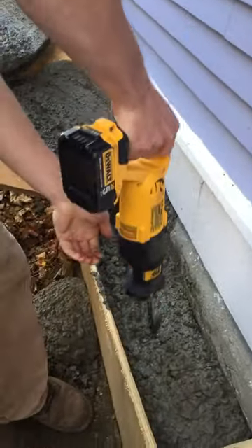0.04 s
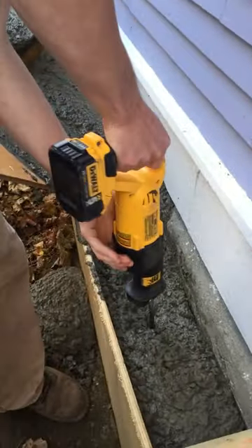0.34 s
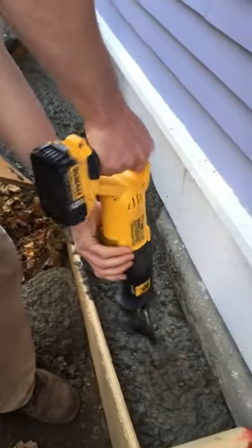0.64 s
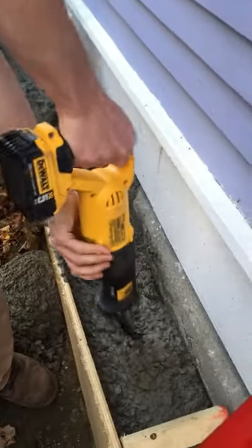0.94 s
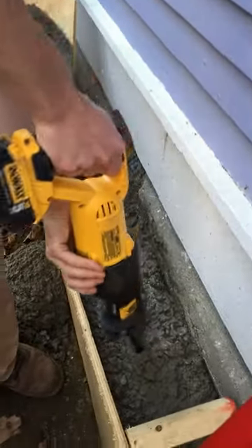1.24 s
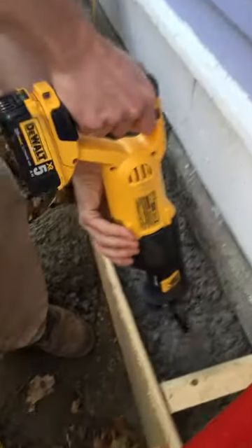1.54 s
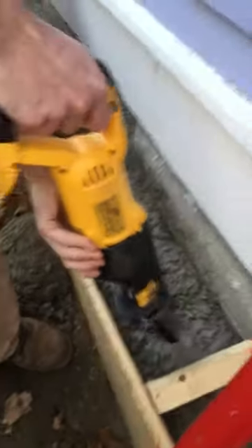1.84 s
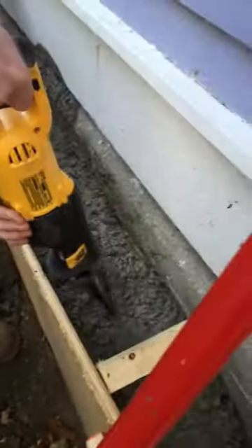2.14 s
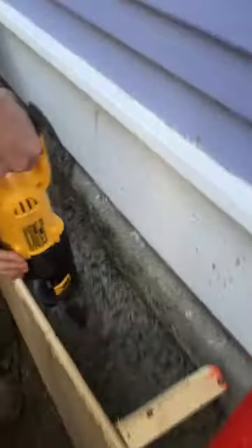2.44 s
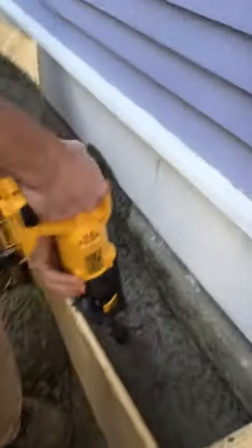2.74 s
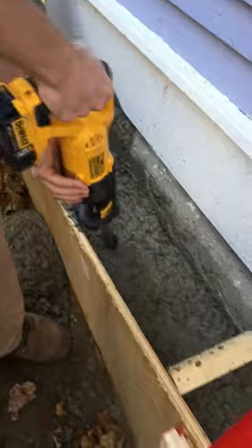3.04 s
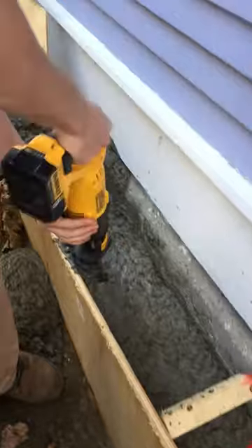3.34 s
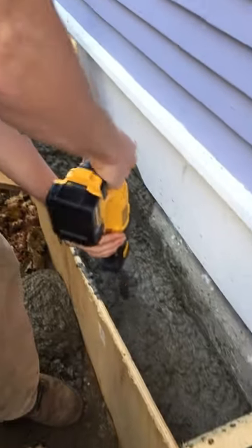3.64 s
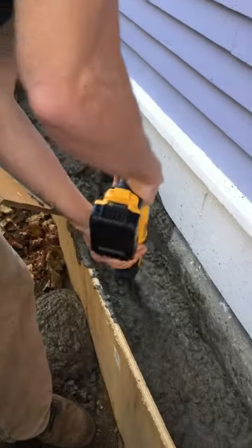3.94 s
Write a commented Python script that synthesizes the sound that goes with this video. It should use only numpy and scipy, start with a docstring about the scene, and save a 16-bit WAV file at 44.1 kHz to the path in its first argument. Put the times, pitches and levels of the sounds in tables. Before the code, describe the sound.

Fast steel clacking and knocking from a reciprocating saw vibrating wet concrete, then running lighter.

```python
"""Fast steel clacking and knocking: a cordless reciprocating saw shakes a rod in wet concrete.
Every stroke clacks in the drive and knocks the rod about, ringing housing, shaft and rod over a motor whine.
The saw labours at about 30 strokes a second, then runs lighter at about 40.
Outdoors: a house wall and the ground return quick echoes; an engine idles behind."""
import sys
import numpy as np
from scipy import signal
from scipy.fft import rfft, irfft
from scipy.io import wavfile

SR = 44100
rng = np.random.default_rng(int(sys.argv[2]) if len(sys.argv) > 2 else 0)


def master(y):
    """Save y as 16-bit WAV."""
    cut = np.clip(np.atleast_2d(y).T, -1, 1)
    pcm = np.round(cut * 32767)  # scale
    wavfile.write(sys.argv[1], SR, pcm.astype(np.int16))


N = 176400
TIME = np.arange(N) / SR
HZ = np.maximum(np.arange(N + 1) * SR / (2 * N), 1)
TRIGGER_S, UNLOAD_S = .473, 2.485  # saw starts; load comes off the rod


def from_db(db):
    """Decibels to gain."""
    return 10 ** (np.asarray(db) / 20)


def rms_one(x):
    """Scale to rms 1."""
    return x / np.sqrt(np.mean(x ** 2) + 1e-20)


def in_time(rows):
    """Columns of a time curve at every sample."""
    time_s, *columns = np.transpose(rows)
    return [np.interp(TIME, time_s, column) for column in columns]


def along_hz(points):
    """Spectrum in dB at every frequency in HZ."""
    hz, db = np.transpose(points)
    return np.interp(np.log(HZ), np.log(hz), db)


def colour(x, response_db):
    """Causal, minimum-phase filter."""
    cepstrum = irfft(np.log(from_db(response_db)))
    cepstrum[1:N] *= 2
    cepstrum[N + 1:] = 0
    return irfft(rfft(x, 2 * N) * np.exp(rfft(cepstrum)))[:N]


def drift(rate_hz, size=16000):
    """Unit normal draws at rate_hz, joined by straight lines."""
    return np.interp(TIME * rate_hz, np.arange(size), rng.standard_normal(size))


def swell(centre_s, width_s):
    """Smooth bump of height 1."""
    return np.exp(-((TIME - centre_s) / width_s) ** 2)


def unload(loaded, light, fade_s=.027):
    """Crossfade from the value under load to the value running light."""
    return loaded + (light - loaded) * np.clip((TIME - UNLOAD_S) / fade_s + .5, 0, 1)


def idling_engine(rush_db=-35.5, wander_rad=.059):
    """Wavering low tones over rumble and hiss; the level sinks as the saw starts."""
    # engine tones: pitch_hz, level_db, waver_db
    lines = [(40.9, -36.5, 0.5), (68, -59, -7), (118, -37, 1.5), (133.3, -40, 3), (277, -54.5, -4),
             (298.7, -49.5, 1.5)]
    # rumble and hiss spectrum: freq_hz, relative_db
    rush_shape = [(22, -22), (40, -24), (58, -15.5), (90, -14), (140, -20.5), (190, -22), (310, -26),
                  (430, -32.5), (540, -30.5), (750, -30.5), (2000, -36), (3700, -43.5), (4900, -53.5),
                  (7000, -59.5), (15000, -68.5)]
    # overall level: time_s, gain_db
    level = [(0, 2.5), (.33, 2.5), (.5, 1), (.8, -11), (2.4, -8), (4, -6.5)]
    tones = 0
    for hz, db, waver_db in lines:
        gain = from_db(db + waver_db * drift(9.3)) * np.sqrt(2)
        tones += gain * np.sin(2 * np.pi * (hz * TIME + rng.random()) + wander_rad * drift(9))
    rush = rms_one(colour(rng.standard_normal(N), along_hz(rush_shape)))
    return from_db(in_time(level)[0]) * (tones + from_db(rush_db) * rush)


def thump(pitch_hz=68.4, level_db=-27):
    """Soft low thump just before the saw starts."""
    return from_db(level_db) * swell(.325, width_s=.025) * np.sin(2 * np.pi * pitch_hz * TIME)


def yard_echoes(x, delay_wander=.117):
    """Nearby hard surfaces return quick echoes, shifting as the tool moves."""
    # wall, form boards and ground: delay_s, gain_db
    echoes = [(.0023, -15.5), (.0071, -21), (0.0128, -24)]
    return x + sum(from_db(db) * np.interp(TIME - delay_s * (1 + delay_wander * drift(3)), TIME, x)
                   for delay_s, db in echoes)


def motor_whine(strokes, roughness_hz=16, swing_hz=28):
    """Rough tones climb as the load comes off; the motor slows and recovers within each stroke."""
    # whine curve: time_s, pitch_hz, level_db (re knocking)
    curve = [(1.2, 3060, -22), (2.47, 2960, -13), (2.6, 3560, -20), (2.75, 3635, -7.5), (3.24, 3660, -11.5),
             (3.35, 3780, -8), (3.57, 3815, -9.5), (3.72, 3970, -13), (4.0, 4120, -19)]
    # whine tones: pitch_ratio, level_db
    partials = [(0.824, -4), (1, -3)]
    pitch_hz, level_db = in_time(curve)
    cycles = np.cumsum(pitch_hz + swing_hz * np.sin(2 * np.pi * strokes)) / SR
    tones = 0
    for ratio, db in partials:
        roughness = 1 + drift(roughness_hz) + 1j * drift(roughness_hz)
        tones += from_db(db) * rms_one(np.real(roughness * np.exp(2j * np.pi * ratio * cycles)))
    return from_db(level_db) * tones * np.minimum(strokes, 1)


def passing_rings(clacks, knocks, fade_s=.048, clacks_only_above_hz=5000):
    """Single resonances swell and fade as the rod bears differently."""
    # resonances: start_s, end_s, pitch_hz, width_hz, level_db (re knocking)
    rings = [(.54, .61, 2600, 700, -9), (.76, .83, 240, 90, -12), (1.1, 1.32, 800, 70, -17),
             (1.96, 2.0, 210, 90, -12), (2.156, 2.47, 597, 50, -16), (2.32, 2.46, 1600, 90, -9),
             (3.73, 4.0, 8000, 600, -16.5), (3.77, 4.05, 1180, 300, -12), (1.25, 1.35, 5850, 160, -13),
             (0.42, .70, 1972, 40, -4.5), (0.542, .98, 1835, 60, -13), (.84, .95, 13600, 120, -16),
             (2.58, 2.70, 10240, 70, -15), (2.74, 2.94, 13600, 110, -16)]
    out = 0
    for start_s, end_s, hz, width_hz, db in rings:
        drive = clacks if hz > clacks_only_above_hz else clacks + knocks
        radius = np.exp(-np.pi * width_hz / SR)
        poles = [1, -2 * radius * np.cos(2 * np.pi * hz / SR), radius ** 2]
        gate = np.clip(np.minimum(TIME - start_s, end_s - TIME) / fade_s + .5, 0, 1)
        out += from_db(db) * gate * rms_one(signal.lfilter([1, 0, -1], poles, drive))
    return out


def steel_pings(times_s, clack_db, scatter_db=6, flare_db=4, flare_rate_hz=11, size=1300):
    """Each clack rings every steel mode with its own strength and pitch; the modes flare and fade."""
    # steel modes: pitch_hz, scatter_hz, decay_s, loaded_db, light_db
    modes = [(5790, 40, .006, -15, -9.5), (6400, 220, .004, -24, -13), (8130, 110, .005, -10.5, -12),
             (10230, 30, .008, -21, -14), (12330, 45, .007, -22, -14.5), (13610, 35, .007, -12.5, -10.5)]
    out, age_s = 0, TIME[:size]
    for hz, scatter_hz, decay_s, loaded_db, light_db in modes:
        mode, decay = np.zeros(N + size), np.exp(-age_s / decay_s)
        draws = rng.standard_normal((len(times_s), 2))
        for start_s, db, (strength, detune) in zip(times_s, clack_db, draws):
            if start_s < TIME[-1]:
                at = int(start_s * SR)
                ping = decay * np.sin(2 * np.pi * (hz + scatter_hz * detune) * age_s)
                mode[at:at + size] += from_db(db + scatter_db * min(strength, 1)) * ping
        flare = from_db(flare_db * drift(flare_rate_hz))
        out += from_db(unload(loaded_db, light_db)) * rms_one(mode[:N] * flare)
    return out


def body_shake(strokes, waver_db=1.5):
    """The tool's body shakes at multiples of the stroke rate."""
    # shake tones: stroke_multiple, loaded_db, light_db
    harmonics = [(2, -42.5, -40.5), (3, -46.5, -44), (4, -36.5, -51), (5, -45, -33)]
    # shake strength: time_s, gain_db
    level = [(.5, -1), (1.4, -9), (1.7, -2.5), (2.4, 1), (2.6, -29)]
    level_db, = in_time(level)
    out = 0
    for multiple, loaded_db, light_db in harmonics:
        gain = from_db(level_db + unload(loaded_db, light_db) + waver_db * drift(9.7)) * np.sqrt(2)
        out += gain * np.sin(2 * np.pi * (multiple * strokes + rng.random()))
    return out * np.minimum(strokes, 1)


def rod_rattles(rate_hz=70, clack_db=-24, knock_db=-2, scatter_db=3, count=600):
    """The loose rod knocks at random moments. Rows: time_s, clack_db, knock_db."""
    times_s = TRIGGER_S + np.cumsum(rng.exponential(1, count)) / rate_hz
    offset_db = scatter_db * rng.standard_normal(count)
    return list(zip(times_s, clack_db + offset_db, knock_db + offset_db))


def contacts(strokes, jitter_s=.0008, clack_scatter_db=.56, knock_scatter_db=.252, bang_lift_db=3.5):
    """Slightly uneven stroke contacts, rattles and hard bangs. Rows: time_s, clack_db, knock_db."""
    # contacts in one stroke under load: cycle_share, clack_db, knock_db
    loaded_stroke = [(-.04, 4, -3), (.07, -17, 4.5), (.29, -12.5, 7), (.40, -18, 0), (.57, -7.5, -5)]
    # running light: cycle_share, clack_db, knock_db
    light_stroke = [(-.06, 3.5, -17), (.06, -5.5, 7.5), (.18, -56, -25), (.50, -3, 0), (.64, -30, 6)]
    # hard bangs of the rod: time_s, clack_db, knock_db
    bangs = [(0.472, 11, 5), (0.503, 4.5, 4.5), (.542, -12, 3.5), (.576, 4, 0), (0.61, 2, -0.5),
             (0.63, 6, 0), (0.642, -7, -2), (0.676, 4, 10.5), (0.702, 1, 6), (0.711, 6.5, -3),
             (0.736, 2.5, 4), (0.775, 4.5, 11), (0.802, 2, 8.5), (0.812, 3.5, 7.5), (0.887, 1.5, 5.5),
             (0.898, 4, -18), (1.027, -7, 5), (1.152, 1, 0), (1.264, 0.5, 3), (1.307, 3.5, 1),
             (1.324, 4, 3.5), (1.383, 3.5, 4), (1.415, 4, 3), (1.449, 4.5, 1), (1.481, 6.5, 4),
             (1.583, 5, -2), (1.616, 4, 8), (1.697, -15, 8), (1.796, -20, 7.5), (1.826, 3, 7.5),
             (1.853, 3.5, 6), (1.912, 3.5, 3), (1.955, 1, 6.5), (1.978, 5, 2.5), (2.042, 4, -8),
             (2.073, 2, -4), (2.173, 1, 5), (2.334, -4, 8), (2.368, 1.5, 6.5), (2.401, 6, -1),
             (2.410, 2.5, -9), (2.445, 1, 2), (2.468, 1, 7), (2.636, 8, 6), (2.769, 7.5, 3),
             (2.794, 5.5, 5.5), (2.95, 2.5, 6.5), (3.235, 3, -13), (3.313, 2, 5), (3.690, 2.5, 7),
             (3.839, 1, -1), (3.865, 0, 7.5), (3.913, 1, 4), (3.959, 3.5, 6.5)]
    running, rows = TIME > TRIGGER_S, []
    for stroke in range(int(strokes[-1]) + 1):
        is_light = np.interp(stroke, strokes[running], TIME[running]) > UNLOAD_S
        for share, clack_db, knock_db in light_stroke if is_light else loaded_stroke:
            late, force, knock_force = rng.standard_normal(3)
            due_s = np.interp(stroke + share, strokes[running], TIME[running], right=2 * TIME[-1])
            rows.append((due_s + jitter_s * late,
                         clack_db + clack_scatter_db * force,
                         knock_db + knock_scatter_db * (force + knock_force)))
    bang_s, clear_s = np.array(bangs)[:, 0], .0057  # a bang displaces contacts this close to it
    rows = [row for row in rows + rod_rattles() if np.abs(row[0] - bang_s).min() > clear_s]
    return np.vstack([rows, np.array(bangs) + [0, bang_lift_db, bang_lift_db]])


def vary_colour(x, bands=16, scatter_db=1.73, rate_hz=45):
    """Each band wavers on its own, so no two blows have the same colour."""
    position = np.sqrt(np.arange(N // 2 + 1) / (N // 2)) * (bands - 1)
    spectrum, out = rfft(x), 0
    for k in range(bands):
        band = irfft(spectrum * np.clip(1 - np.abs(position - k), 0, 1), N)
        out += band * from_db(scatter_db * drift(rate_hz))
    return out


def chatter(times_s, level_db, rise_s, grind_db, grain_db, decay_s=.0058):
    """Each contact is a dying spray of tiny impacts (grainy noise) over the grinding of the gears."""
    hits, inside = np.zeros(N), times_s < TIME[-1]
    np.add.at(hits, (times_s[inside] * SR).astype(int), from_db(level_db[inside]) ** 2)
    spin_up_db = 6.5 * swell(.575, width_s=.025)
    grinding = from_db(grind_db + spin_up_db + unload(0, 1))  # 1 dB more at the higher speed
    energy = signal.lfilter([1], [1, -np.exp(-2 / (decay_s * SR))], hits + 1e-18) + grinding ** 2
    rise = np.exp(-1 / (rise_s * SR))
    envelope = np.sqrt(signal.lfilter([1 - rise], [1, -rise], energy))
    spray = envelope * rng.standard_normal(N) * from_db(grain_db * drift(2500))
    return vary_colour(spray) * (TIME > TRIGGER_S)


def tool_body(clacks, knocks, clack_gain, knock_gain, clack_trim_db=1, knock_trim_db=-.5):
    """Housing, shaft and rod colour the contacts, differently under load and running light."""
    # resonances: freq_hz, nominal_width_hz, loaded_lift_db, light_lift_db
    modes = [(633, 100, 7, 2.5), (1061, 107, 3, 5.5), (1543, 170, 2.5, 6.5), (1850, 120, 4, 1),
             (1952, 63, 3, 2), (2123, 77, 3, 3.5), (3040, 140, 2, 2.5), (4620, 120, 3, -1)]
    # clack spectrum: freq_hz, relative_db
    clack_shape = [(300, -15.5), (1200, -2), (2500, 3), (4100, 1.5), (5200, -2.5), (7000, -1.5), (9000, -1),
                   (10800, -4), (14000, -4), (16000, -14.5)]
    # knock spectrum under load: freq_hz, relative_db
    loaded_shape = [(25, -50), (60, -6), (150, -2.5), (260, -2), (450, -7.5), (750, -4), (1100, -4.5),
                    (1700, -0.5), (2500, -2.5), (3300, -3.5), (5000, -10.5), (10000, -20.5)]
    # knock spectrum running light: freq_hz, relative_db
    light_shape = [(25, -59), (60, -10.5), (150, -0.5), (260, -3.5), (450, -9), (750, -5), (1100, -5.5),
                   (1600, -4), (2500, -3), (3700, -2.5), (5000, -9), (10000, -20.5)]
    out, light = 0, unload(0, 1)
    for is_light, share, knock_shape in ((False, 1 - light, loaded_shape), (True, light, light_shape)):
        lift_db = sum((light_db if is_light else loaded_db) / (1 + ((HZ - hz) / (.62 * width_hz)) ** 2)
                      for hz, width_hz, loaded_db, light_db in modes)
        clacking = from_db(clack_trim_db) * rms_one(colour(clacks, along_hz(clack_shape) + lift_db))
        knocking = from_db(knock_trim_db) * rms_one(colour(knocks, along_hz(knock_shape) + lift_db))
        out += share * (clack_gain * clacking + knock_gain * knocking)
    return out


def saw():
    """The strokes time the clacks and knocks, warble the whine and shake the body."""
    # saw speed: time_s, stroke_rate_hz
    speed = [(0.473, 31.85), (0.799, 28.52), (0.827, 22.14), (0.98, 32.76), (1.073, 33.78), (1.099, 30.29),
             (1.271, 34.4), (1.493, 29.63), (1.793, 29.31), (1.856, 32.58), (1.95, 31.22), (2.268, 30.24),
             (2.474, 31.13), (2.61, 37.92), (3.293, 39.1), (3.609, 40.57), (3.696, 38.7), (4.0, 42.61)]
    # saw level: time_s, knocking_db, clacking_db
    level = [(.48, -26.5, -50), (.51, -20, -32), (.54, -13.5, -14.5), (.58, -14, -18), (.62, -14, -16.5),
             (.67, -18, -25.5), (.80, -19.5, -25.5), (.90, -16.5, -21), (1.0, -17.5, -22.5),
             (1.25, -17.5, -22), (1.46, -20.5, -25), (1.85, -18.5, -23.5), (2.2, -18, -22.5),
             (2.46, -19.5, -21), (2.5, -23, -25.5), (2.7, -22, -29.5), (2.85, -21, -23), (3.98, -21.5, -24)]
    stroke_rate_hz, = in_time(speed)
    knock_gain, clack_gain = from_db(in_time(level))
    strokes = np.cumsum(stroke_rate_hz * (TIME > TRIGGER_S)) / SR
    times_s, clack_db, knock_db = contacts(strokes).T
    clacks = chatter(times_s, clack_db, rise_s=.0014, grind_db=-15, grain_db=5)
    knocks = chatter(times_s, knock_db, rise_s=.0023, grind_db=-7.5, grain_db=2.5)
    tones = knock_gain * (passing_rings(clacks, knocks) + motor_whine(strokes))
    pings = clack_gain * steel_pings(times_s, clack_db)
    return tool_body(clacks, knocks, clack_gain, knock_gain) + tones + pings + body_shake(strokes)


def scene():
    """The saw close by, the engine behind; mono."""
    return (yard_echoes(saw()) + idling_engine() + thump())[None]


def record(dry, cutoff_hz=15900, ceiling=.7):
    """Peaks are rounded and the top treble is cut."""
    low_pass = signal.ellip(10, .2, 80, cutoff_hz, fs=SR, output="sos")
    filtered = signal.sosfilt(low_pass, dry)
    rounded = filtered / (1 + (filtered / ceiling) ** 8) ** (1 / 8)
    return signal.sosfiltfilt(low_pass, rounded)


dry = scene()
out = record(dry)
master(out)
```